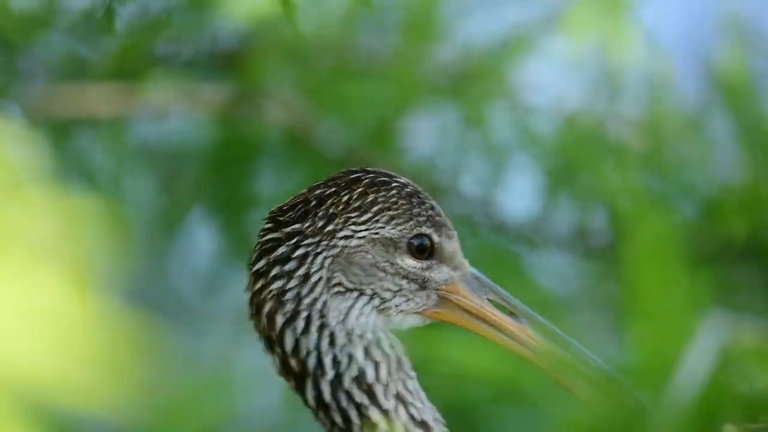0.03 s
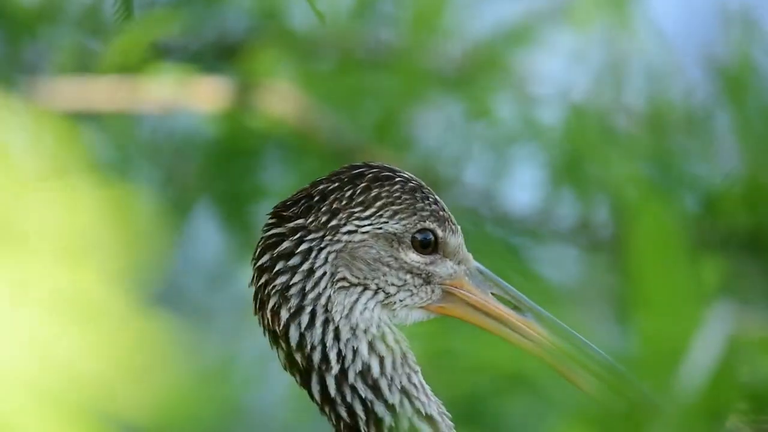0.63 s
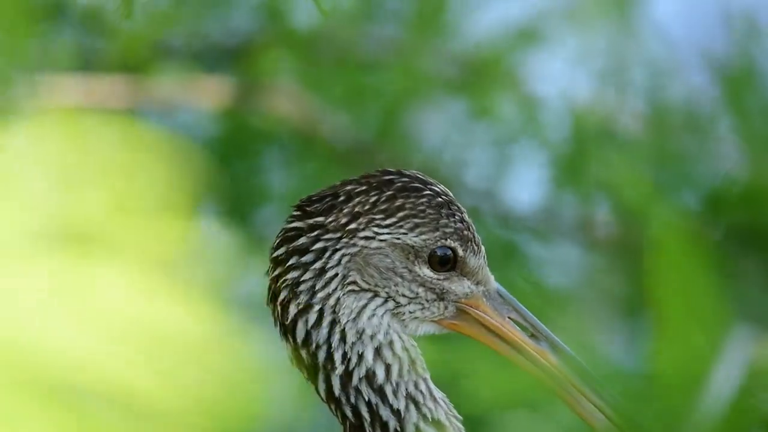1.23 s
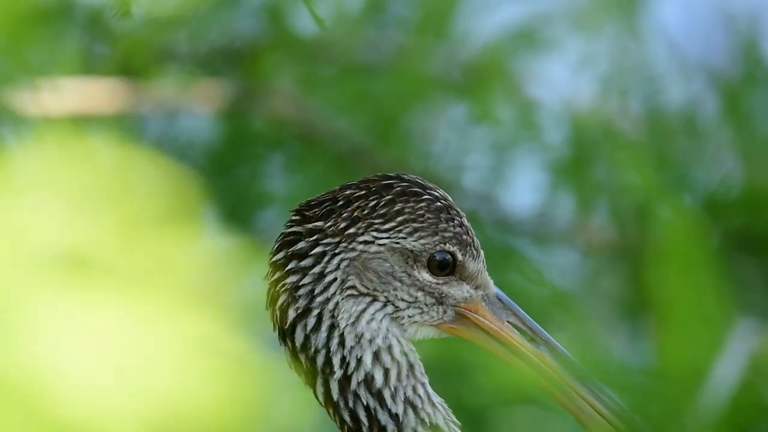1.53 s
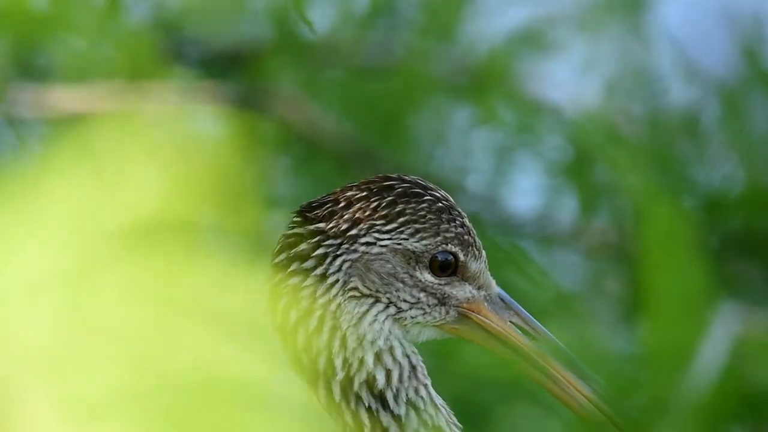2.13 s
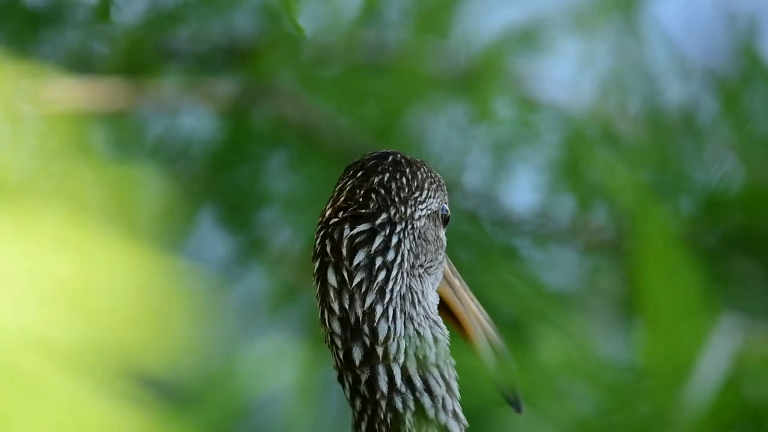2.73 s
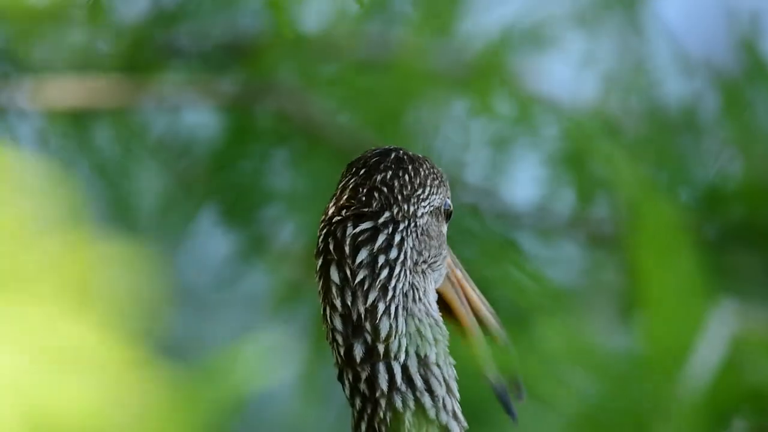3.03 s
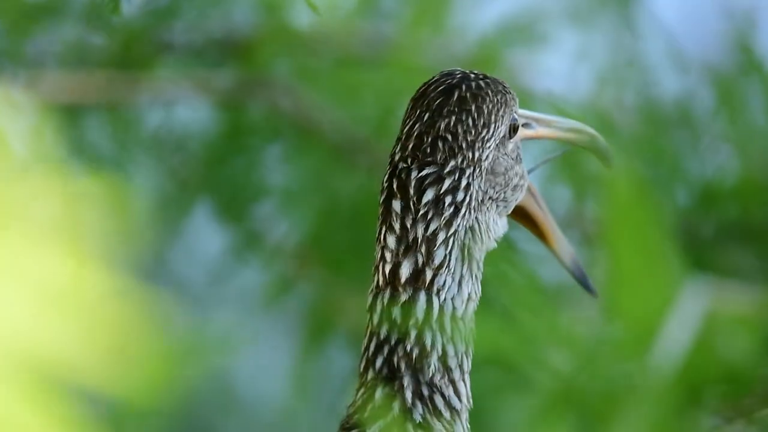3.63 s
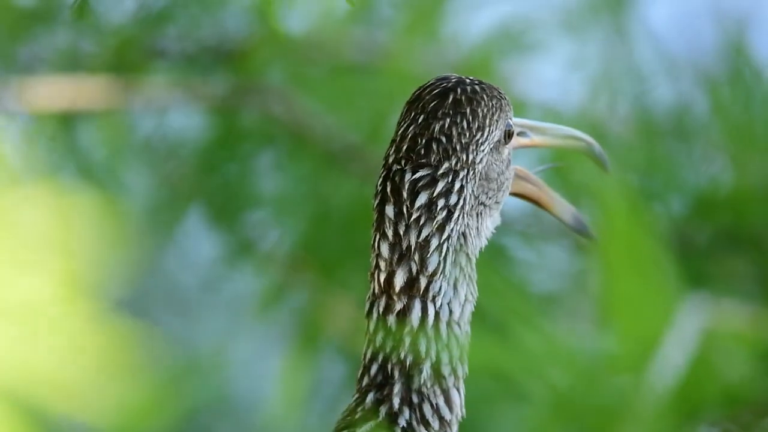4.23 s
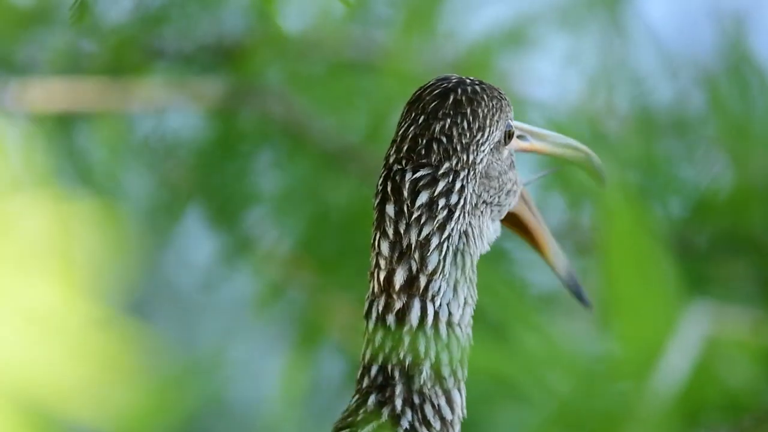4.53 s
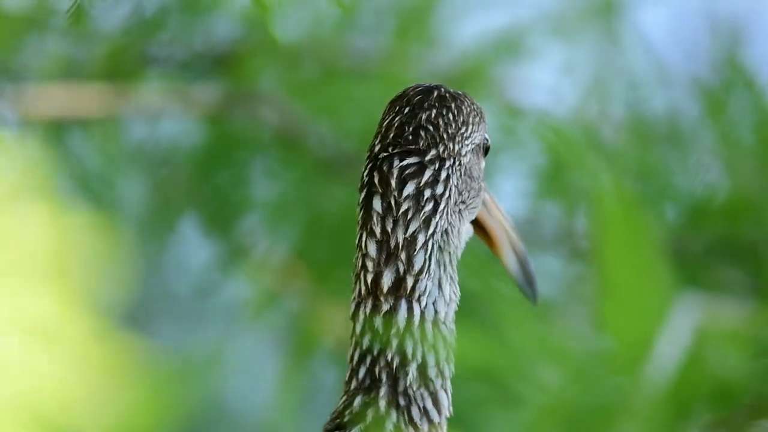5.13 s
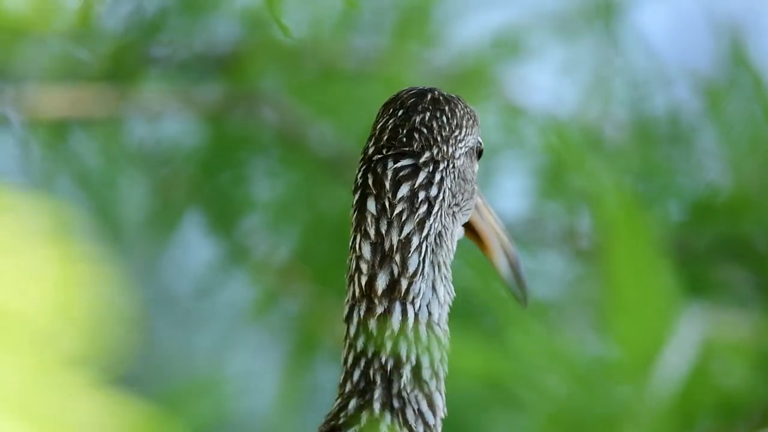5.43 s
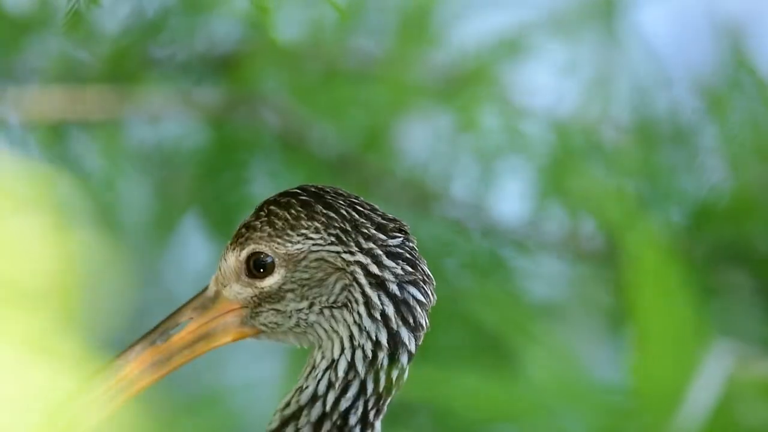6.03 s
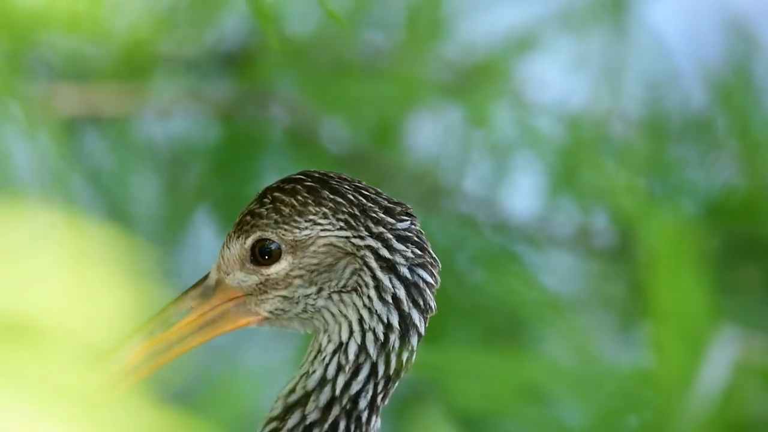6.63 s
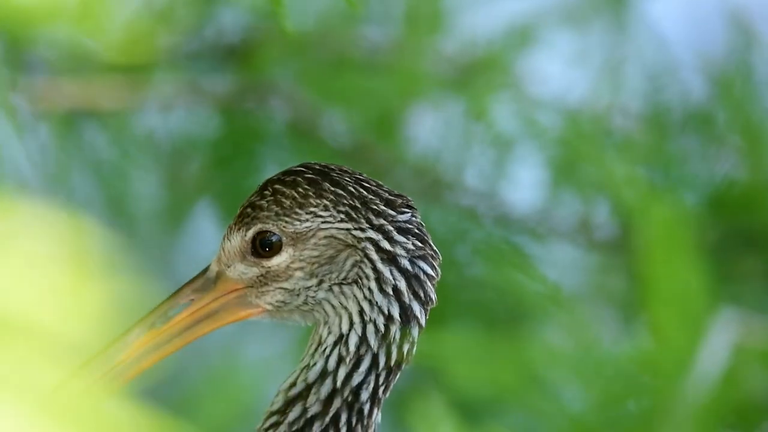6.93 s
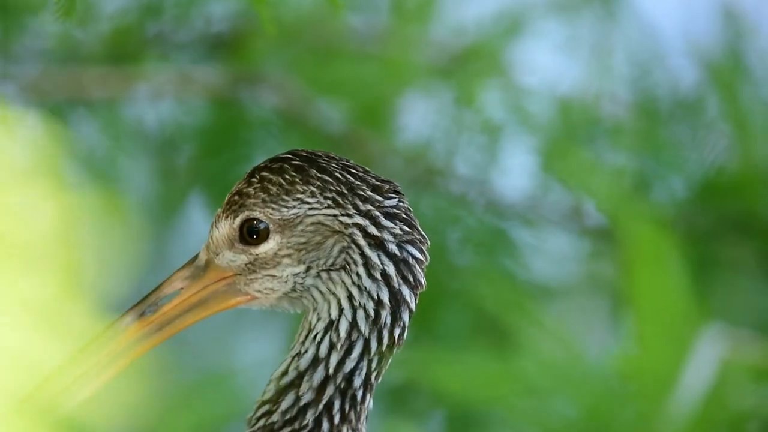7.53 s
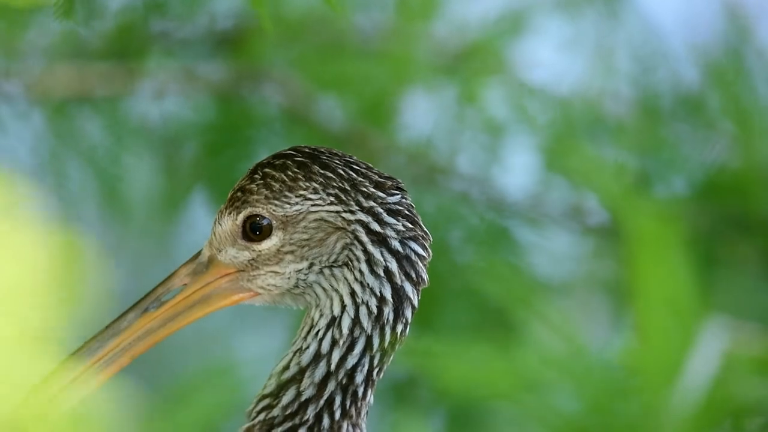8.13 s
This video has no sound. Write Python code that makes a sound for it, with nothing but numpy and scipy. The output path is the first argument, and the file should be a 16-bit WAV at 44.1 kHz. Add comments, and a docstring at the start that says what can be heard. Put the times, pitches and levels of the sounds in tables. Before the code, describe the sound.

Outdoors among trees, a soft far rumble, a light hiss and a very faint insect note run throughout. For the first 2.5 seconds, uneven wind buffets the microphone with low rumbles and dull thumps, strongest from 1.5 to 2.3 seconds, alongside faint dry trills and barely audible leaves. At about 3.1 seconds a wading bird close by breaks from a short rasp into a loud, high, harsh wail. It holds, turns rough, sags in pitch and ends in a croak near 3.8 seconds. At 4.5 seconds a second, shorter call follows: a rasp, a brief wail and a croak ending near 4.9 seconds. Both leave a slight echo among the trees. Small birds give short falling chirps and higher peeps throughout, with thin whistles between 5 and 6.6 seconds. Scattered tiny twig ticks and chirps continue until the end, just after 8 seconds.

```python
"""Wading bird wailing among trees

A bird close by gives two loud wails. Each breaks out of a rasp (syrinx pulses ringing the throat),
passes between a clear harmonic tone and a split one an octave lower, and ends in a croak.
Before it calls, eddies of wind buffet the microphone and leaves rustle. Small birds chirp in gliding
tones, an insect trills, twigs tick with a woody ring, and a far rumble lies under it all."""
import sys
import numpy as np
from scipy import signal
from scipy.fft import rfft, irfft
from scipy.io import wavfile
from scipy.ndimage import uniform_filter1d, map_coordinates

SR = 44100
rng = np.random.default_rng(int(sys.argv[2]) if len(sys.argv) > 2 else 0)


def unload_wav(signal):
    """Save mono or channel-first audio to the path in sys.argv[1] as 16-bit WAV at rate SR, clipped to [-1, 1]."""
    wavfile.write(
        sys.argv[1],
        SR,
        np.round(np.clip(np.atleast_2d(signal).T, -1, 1) * 32767).astype(np.int16),
    )


N = 369999
TIME = np.arange(N) / SR
FREQS = np.maximum(np.fft.rfftfreq(N + 5001, 1 / SR), 1)

# spectra of the far rumble, diffuse hiss and leaves: (frequency [Hz], relative level [dB])
FAR_SPECTRUM = [(20, -18), (60, -8.5), (110, -3), (220, -2.5), (400, -7.5), (1000, -11.5), (2150, -14),
                (2550, -16.5), (2750, -18), (3800, -29), (7000, -56.5)]
HISS_SPECTRUM = [(100, -37), (1000, -19.5), (2500, 4.5), (3600, 3.5), (4800, 4), (6000, 1.5), (7200, -8),
                 (9000, -11.5), (12000, -13), (15500, -19)]
LEAF_SPECTRUM = [(1500, -3), (4800, 16.5), (7000, 7), (9000, 8), (12500, -3), (15500, -13)]
# far drone: (frequency [Hz], level [dB])
DRONE_TONES = [(223, -54), (433, -55.5)]
# swells of the leaves: (centre time [s], half length [s], relative level [dB])
LEAF_SWELLS = [(.03, 0.057, -54), (.21, 0.052, -57), (1.32, 0.068, -57), (1.8, .1, -58.5),
               (1.99, 0.13, -58)]

# wind strength at the microphone: (time [s], level [dB])
WIND_CURVE = [(0.0, -22), (0.13, -26), (0.26, -24), (0.47, -27.5), (0.52, -36), (0.9, -43), (0.98, -46.5),
              (1.18, -45), (1.4, -29), (1.64, -31.5), (1.76, -18.5), (1.91, -26.5), (2.07, -17.5),
              (2.24, -32.5), (2.29, -18.5), (2.42, -25.5), (2.66, -40.5), (2.73, -51)]
# short dull puffs: (centre time [s], half length [s], level [dB])
WIND_PUFFS = [(.022, 0.0075, -24), (.575, 0.021, -25), (.625, 0.016, -21.5), (.745, 0.025, -27.5),
              (.808, 0.0065, -22.5), (.87, 0.033, -25.5), (1.07, 0.012, -26.5), (1.287, 0.0063, -24.5),
              (1.562, 0.019, -16), (2.62, 0.083, -31), (2.97, 0.021, -29.5), (3.53, .11, -38.5),
              (5.52, 0.063, -41)]
# hardest eddies: (time [s], relative peak level [dB])
HARD_EDDIES = [(0.019, -4.5), (0.085, -5.5), (0.205, -6.5), (0.255, -2), (0.33, -14), (0.349, -7),
               (0.574, -7.5), (0.806, -10), (1.462, -6), (1.548, 3), (1.562, 4.5), (1.578, -2), (1.686, -8),
               (1.868, -15), (2.035, -5), (2.064, -17), (2.273, -2.5)]
# spectra of the wind's rumble and flutter: (frequency [Hz], relative level [dB])
WIND_SPECTRUM = [(20, -31), (45, -17), (80, -6), (150, 1), (330, 2), (450, -4), (650, -20), (1200, -64.5)]
FLUTTER_SPECTRUM = [(200, -18.5), (380, -5), (500, 0.5), (700, -4.5), (1000, -15.5), (1500, -32),
                    (2500, -36), (6000, -75)]
# stereo balance of the wind: (frequency [Hz], left minus right [dB])
WIND_BALANCE = [(150, 0), (380, 3), (800, 9), (1300, 8), (2400, 2.5)]

# twig ticks: (time [s], peak level [dB], left minus right [dB], gain of the woody mode [dB])
TWIG_TICKS = [(0.094, -29, -11, 21), (0.564, -25.5, -8, 17), (1.7304, -20, -5, 4), (2.162, -26.5, 8, -6),
              (2.2044, -25.5, 9, -4), (2.5981, -27, 9, -2), (2.683, -20.5, 7.5, -2), (3.0636, -24.5, 9, 3),
              (3.151, -24, 7.5, -5), (4.107, -25, -12, 23), (4.5007, -21.5, 7, 6), (4.878, -21.5, -3, 2),
              (5.4977, -31, -9, 7), (5.5908, -29, -3, 3), (6.703, -32, 11, 0), (6.8327, -29.5, 13, -4.5),
              (7.979, -31, 5, 4), (8.0344, -29, -1.5, 0), (8.182, -24, 6, 0)]
# resonances of a crack: (frequency [Hz], bandwidth [Hz], gain [dB])
CRACK_MODES = [(3670, 820, -10), (4960, 330, 1.5), (8700, 4600, -17), (12000, 3100, -22.5)]
# dry trills: (centre time [s], length [s], relative level [dB])
TRILL_SWELLS = [(0.054, 0.67, -53.5), (0.538, 0.14, -49), (0.911, 0.16, -46.5), (1.328, 0.28, -49.5),
                (1.682, 0.2, -47), (2.606, 0.11, -52.5), (2.927, 0.12, -45)]
# their buzz: (frequency [Hz], relative level [dB])
BUZZ_SPECTRUM = [(3000, -7.5), (4900, -0.5), (5700, 5.5), (6500, 2), (7200, -7), (8500, -8.5), (11000, -46)]
# falling chirps: (centre time [s], level [dB], centre pitch [Hz], second harmonic [dB])
FALLING_CHIRPS = [(.272, -18.5, 2384, -11.5), (1.42, -19, 2418, -13.5), (3.122, -24, 2320, -8.5),
                  (5.256, -41, 2850, -12), (5.558, -44.5, 2940, -12), (5.91, -26, 2357, -13),
                  (6.967, -27.5, 2300, -14), (7.938, -22, 2410, -9)]
# arched chirps: (centre time [s], relative level [dB], top pitch [Hz])
ARCHED_CHIRPS = [(.375, -40, 4700), (1.48, -36.5, 4750), (1.701, -35, 4450), (1.944, -34.5, 4530),
                 (2.192, -36.5, 4670), (4.1, -37, 4480), (5.29, -39.5, 4600), (5.545, -36.5, 4470),
                 (5.838, -30.5, 4660), (6.089, -30.5, 4480), (8.189, -38.5, 4500)]
# rising whistles: (centre time [s], level [dB], centre pitch [Hz], half length [s], jitter [fraction])
RISING_WHISTLES = [(1.847, -41, 5080, 0.022, 0.0048), (5.077, -45.5, 5550, 0.03, 0.012),
                   (5.217, -47, 5630, 0.021, 0.068), (5.42, -57, 5300, 0.033, .004),
                   (5.474, -42.5, 5500, 0.016, 0.056), (5.61, -51, 5250, 0.026, .004),
                   (5.774, -45.5, 5350, 0.016, 0.072), (6.014, -46, 5400, 0.016, .06),
                   (6.194, -47, 5230, 0.031, .004), (6.428, -50.5, 5290, 0.03, .004),
                   (6.61, -56, 5170, 0.037, .004)]

# rasps and croaks: (start [s], full strength [s], end [s], relative level [dB], pitch [Hz],
# flutter rate [Hz], jitter [fraction])
RASP_BURSTS = [(3.105, 3.107, 3.119, -22.5, 1220, 158, 0.066), (3.16, 3.169, 3.196, -16.5, 1350, 240, 0.08),
               (3.214, 3.218, 3.227, -14.5, 1430, 227, 0.079),
               (3.745, 3.797, 3.798, -23.5, 1220, 130, 0.16), (3.799, 3.794, 3.82, -20, 1247, 196, 0.22),
               (3.842, 3.848, 3.851, -22, 1202, 186, .1), (4.501, 4.535, 4.548, -18, 1194, 157.5, .1),
               (4.538, 4.56, 4.627, -12, 1595, 193, 0.092), (4.748, 4.76, 4.808, -25.5, 1230, 180, 0.16),
               (4.815, 4.822, 4.852, -21, 1261, 180, 0.093)]
# formants of the throat and open bill: (frequency [Hz], bandwidth [Hz], gain [dB])
THROAT_MODES = [(1166, 45, 10.5), (1660, 540, -1), (2280, 150, -1.5), (2760, 88, 1.5), (3354, 34, 3.5),
                (3910, 140, 1.5), (5260, 1400, -5), (6380, 1000, 5)]
# arch of each wail: (time [s], clear pitch [Hz], effort [dB])
FIRST_ARCH = [(3.228, 1439, -5.5), (3.25, 1405, -1.5), (3.35, 1461, -.5), (3.42, 1482, 3), (3.54, 1457, 0),
              (3.575, 1407, -0.5), (3.72, 1333, -2), (3.787, 1271, -5), (3.8, 1162, -10.5)]
SECOND_ARCH = [(4.632, 1455, -0.5), (4.66, 1486, 1.5), (4.712, 1464, 2.5), (4.733, 1389, -1.5),
               (4.765, 1297, -2), (4.805, 1258, -5.5), (4.82, 1109, -9), (4.847, 1270, -12.5)]
# response of windpipe and bill for harmonics 1-4: (frequency [Hz], gain [dB])
TRACT_RESPONSE = [(1050, -4.5), (1205, -3), (1285, -19.5), (1370, -14.5), (1470, -14), (2100, -21.5),
                  (2430, -20.5), (2555, -25.5), (2670, -14.5), (2790, -10), (2930, -18.5), (3400, -21),
                  (3760, -14), (4050, -24.5), (4190, -31), (4390, -21.5), (4900, -30.5), (5900, -27)]
# higher harmonics: (frequency [Hz], level relative to the fourth [dB])
UPPER_HARMONICS = [(5500, -7), (6300, -5.5), (7200, -16), (8800, -19.5), (11500, -32), (15000, -53)]
# spans of split voice: (start [s], end [s], relative level of the subharmonics [dB])
SPLIT_SPANS = [(3.21, 3.369, -14.5), (3.656, 3.83, -16.5), (4.759, 4.87, -20)]
# subharmonics, halfway between the harmonics: (frequency [Hz], relative level [dB])
SUBHARMONIC_SPECTRUM = [(650, -12.5), (2000, -11.5), (3000, -3.5), (3270, 7), (3550, -8), (4400, -2),
                        (4800, -10), (5700, -8), (6700, -21), (8500, -28), (12000, -39), (15000, -74)]
# stereo balance of the voice: (frequency [Hz], left minus right [dB])
VOICE_BALANCE = [(700, 4.5), (1300, 0.5), (1480, -4.5), (2400, -1.5), (3000, 5), (4400, 4.5), (8000, -0.5),
                 (15000, 4)]
# its phase between the microphones: (frequency [Hz], left lead [rad])
VOICE_PHASE = [(1500, 0.079), (2500, 1.07), (3000, 0.97), (3800, 1.4), (4500, 1.43), (5200, -1.5),
               (6000, 2), (8000, 1.7), (12000, 1.6)]

# notches of the microphone housing: (frequency [Hz], bandwidth [Hz])
HOUSING_NOTCHES = [(7700, 1100), (9600, 1220)]
MIC_LAG_MS = .125


def from_db(db):
    """Decibels to amplitude ratio."""
    return 10 ** (np.asarray(db) / 20)


def rms_one(x):
    """Normalisation to unit rms."""
    return x / np.sqrt(np.mean(x ** 2) + 1e-20)


def at_hz(points, hz):
    """Interpolation on a log-frequency axis."""
    f, value = np.transpose(points)
    return np.interp(np.log(hz), np.log(f), value)


def in_time(rows, t):
    """Linear interpolation of each column at times t."""
    times, *columns = np.transpose(rows)
    return [np.interp(t, times, column) for column in columns]


def phase_of(hz):
    """Phase is the time integral of frequency."""
    return 2 * np.pi * np.cumsum(hz) / SR


def swells(rows):
    """Superposition of Gaussian envelopes, as a gain."""
    return sum(from_db(db) * np.exp(-((TIME - s) / half) ** 2) for s, half, db in rows)


def drift(rate, t=TIME):
    """Smooth random modulation of roughly unit spread, from `rate` values a second."""
    return map_coordinates(rng.standard_normal(40000), [(t - t[0]) * rate], order=2, mode="wrap")


def filtered(x, response):
    """Filtering multiplies the spectrum by a response given on FREQS."""
    size = 2 * (len(FREQS) - 1)
    return irfft(rfft(x, size) * response, size)[..., :N]


def band_limit(x, order, hz, kind="low"):
    """Filtering with a maximally flat passband."""
    return signal.sosfilt(signal.butter(order, hz, kind, fs=SR, output="sos"), x)


def noise(spectrum):
    """Spectral shaping of white noise, at unit rms."""
    return rms_one(filtered(rng.standard_normal(N), from_db(at_hz(spectrum, FREQS))))


def resonate(x, modes):
    """Modal superposition: damped resonators in parallel, with alternating sign."""
    out = 0
    for k, (hz, width, db) in enumerate(modes):
        r = np.exp(-np.pi * width / SR)
        poles = [1, -2 * r * np.cos(2 * np.pi * hz / SR), r * r]
        ringing = signal.lfilter([1, 0, -1], poles, x + 1e-18)
        out = out + (-1) ** k * from_db(db) * (1 - r * r) / 2 * ringing
    return out


def place(x, pan_db, lead):
    """Level and phase differences give direction: the left is pan_db louder and `lead` radians ahead."""
    half = from_db(pan_db / 2) * np.exp(.5j * lead)
    return filtered(x, np.array([half, 1 / half]))


def delay_left(x, pan_db, lag_ms):
    """A path difference makes the sound reach the left microphone late."""
    return place(x, pan_db, -2 * np.pi * FREQS * lag_ms / 1000)


def trees(x, t60, tail_db, leaf_db, leaf_s, leaf_hz=6000):
    """Scattering: near leaves return short waves; trunks add a tail, different at each microphone."""
    t = TIME[:SR // 2]
    echoes = rng.standard_normal((2, 2, len(t))) * (t > .001) / np.sqrt(len(t))
    scatter = band_limit(echoes[0] * rms_one(np.exp(-t / leaf_s)), 1, leaf_hz, "high")
    tail = echoes[1] * rms_one(from_db(-60 * t / t60))
    return signal.fftconvolve(x, from_db(leaf_db) * scatter + from_db(tail_db) * tail, axes=1)[:, :N]


def background(rumble_db=-41, swell_db=2, swell_below_hz=450, hiss_db=-54.5):
    """Ambient noise: far rumble and drone are coherent at the two microphones, diffuse hiss is not."""
    drone = 0
    for hz, db in DRONE_TONES:
        amplitude = np.sqrt(2) * from_db(db + 1.55 * drift(4.3))
        drone = drone + amplitude * np.sin(phase_of(hz * (1 + .0058 * drift(12))))
    steady = from_db(rumble_db) * noise(FAR_SPECTRUM)
    bass = filtered(steady, 1 / (1 + (FREQS / swell_below_hz) ** 4))
    rumble = steady - bass + bass * from_db(swell_db * drift(9))
    hiss = from_db(hiss_db) * np.array([noise(HISS_SPECTRUM), noise(HISS_SPECTRUM)])
    return delay_left(rumble + drone, pan_db=-1.95, lag_ms=MIC_LAG_MS) + hiss


def wind_level(decay_db_per_s=24):
    """Wind strength in dB, with exponential decay after the last gust."""
    level_db, = in_time(WIND_CURVE, TIME)
    return level_db - decay_db_per_s * np.maximum(TIME - WIND_CURVE[-1][0], 0)


def leaves():
    """Amplitude-modulated noise: a fine rustle swells a few times and dies with the wind."""
    stir = swells(LEAF_SWELLS) + from_db(wind_level() - 53)
    grain = from_db(9 + 4 * drift(300))
    return stir * grain * np.array([noise(LEAF_SPECTRUM), noise(LEAF_SPECTRUM)])


def buffets(wind_db, lesser_per_s=30, spread_db=8.5, eddy_s=.0014):
    """Eddies are pressure pulses on the microphone: a few hard, the lesser random and wind-scaled."""
    wait, strength = rng.random((200, 2)).T
    times = np.cumsum(-np.log(1 - wait)) / lesser_per_s
    excess_db = 8.5 + spread_db * (2 * strength - 1)
    lesser = [(s, wind_db[int(s * SR)] + db) for s, db in zip(times, excess_db) if s < WIND_CURVE[-1][0]]
    out = np.zeros(N)
    t = TIME[:SR // 30]
    swirls = rng.standard_normal((len(HARD_EDDIES) + len(times), len(t))) * t * np.exp(-t / eddy_s)
    for (s, db), swirl in zip(HARD_EDDIES + lesser, swirls):
        thump = band_limit(resonate(swirl, [(440, 210, 0)]), order=2, hz=1400)
        at = int(s * SR)
        out[at:at + len(t)] += from_db(db - 7) * thump / abs(thump).max()
    return out


def wind(flutter_db=-18.5, flutter_db_per_db=1.52):
    """Turbulence rumbles on the microphone; a higher flutter grows faster with wind strength."""
    wind_db, puffs = wind_level(), swells(WIND_PUFFS)
    lumps_db = 4 * drift(130)
    flutter = from_db(flutter_db + flutter_db_per_db * (wind_db - wind_db.max())) + from_db(-12) * puffs
    low = (from_db(wind_db) + puffs) * rms_one(noise(WIND_SPECTRUM) * from_db(.64 * lumps_db))
    high = flutter * rms_one(noise(FLUTTER_SPECTRUM) * from_db(lumps_db))
    return delay_left(low + high + buffets(wind_db), at_hz(WIND_BALANCE, FREQS), MIC_LAG_MS)


def twigs(decay_s=.0012, ring_s=.015, wood_hz=2130, wood_width_hz=220):
    """Impulsive excitation: each tiny crack briefly rings the modes of the wood."""
    out = np.zeros((2, N))
    t = TIME[:SR // 40]
    for s, db, pan_db, wood_db in TWIG_TICKS:
        snap = rng.standard_normal(len(t)) * (np.exp(-t / decay_s) + .095 * np.exp(-t / ring_s))
        crack = resonate(snap, [(wood_hz, wood_width_hz, wood_db), *CRACK_MODES])
        gains = from_db(db + np.array([[.5], [-.5]]) * pan_db)
        at = int(s * SR)
        out[:, at:at + len(t)] += gains * crack / abs(crack).max()
    return out


def trills(pips_per_s=60, pip_hz=4300, buzz_rate_hz=125):
    """Amplitude modulation: a run of tiny falling pips under a faster, higher buzz of pulsed noise."""
    swell = sum(from_db(db) * np.exp(-(2 * (TIME - s) / length) ** 4) for s, length, db in TRILL_SWELLS)
    buzz = from_db(-1.5) * noise(BUZZ_SPECTRUM) * (1 + .62 * np.sin(2 * np.pi * buzz_rate_hz * TIME))
    beat = np.cumsum(pips_per_s * (1 + .055 * drift(10))) / SR % 1
    pitch = pip_hz * (1 + .039 * drift(60) - .11 * (beat - .5))
    pips = from_db(3) * np.sin(np.pi * beat) ** 4 * np.sin(phase_of(pitch))
    return delay_left(swell * (buzz + pips), pan_db=-3, lag_ms=.039)


def insect(hz=2450, width_hz=70, db=-56):
    """Narrow-band noise is heard as a pitch: one insect holds a thin note."""
    mode = [(hz, width_hz, 0)]
    note = rms_one(resonate(resonate(rng.standard_normal(N), mode), mode))
    return delay_left(from_db(db) * note, pan_db=18, lag_ms=.1)


def chirp(middle, db, hz, slope, bend, half_s, octave_db, jitter):
    """Frequency modulation: a near sine glides by `slope` [octaves/s] and `bend` [octaves/s^2]."""
    out = np.zeros(N)
    live = slice(max(int((middle - 2 * half_s) * SR), 0), int((middle + 2 * half_s) * SR))
    t = TIME[live] - middle
    phase = phase_of(hz * 2 ** (slope * t + bend * t * t) * (1 + jitter * drift(711, t)))
    swell = np.exp(-(t / half_s) ** 2) * signal.windows.tukey(len(t), .3)
    tone = np.sin(phase) + from_db(octave_db) * np.sin(2 * phase)
    out[live] = from_db(db + 4.7 * drift(167.5, t)) * swell * tone
    return out


def small_birds():
    """Falling, arched and rising glides; pitch jitter broadens some into hoarseness."""
    falls = sum(chirp(s, db, hz, slope=-6.5, bend=10, half_s=.029, octave_db=octave, jitter=.011)
                for s, db, hz, octave in FALLING_CHIRPS)
    arches = sum(chirp(s, db - 1, hz, slope=.3, bend=-190, half_s=.038, octave_db=-42, jitter=.04)
                 for s, db, hz in ARCHED_CHIRPS)
    whistles = sum(chirp(s, db, hz, slope=3.3, bend=-13.5, half_s=half, octave_db=-37, jitter=jitter)
                   for s, db, hz, half, jitter in RISING_WHISTLES)
    return delay_left(falls, pan_db=-7, lag_ms=.11) + delay_left(arches + whistles, pan_db=7, lag_ms=.112)


def rasps(flutter_depth=.71, release_s=.0051, band_hz=(950, 5800)):
    """Source and filter: irregular syrinx pulses ring the throat and are chopped by a fast flutter."""
    out = np.zeros(N)
    for start, full, end, db, hz, flutter_hz, jitter in RASP_BURSTS:
        live = (TIME > start) & (TIME < end + .02)
        t = TIME[live]
        cycles = np.cumsum(hz * (1 + jitter * drift(1500, t))) / SR
        pulses = np.diff(np.floor(cycles), prepend=0) + .04 * rng.standard_normal(len(t))
        voiced = resonate(pulses, THROAT_MODES)
        voiced = band_limit(voiced, 4, band_hz, "band") + from_db(-18) * voiced
        # steady air pressure evens the strength
        voiced /= np.sqrt(uniform_filter1d(voiced ** 2, size=350) + 1e-12)
        flutter = np.sin(phase_of(flutter_hz * (1 + .025 * drift(147, t))))
        chopped = voiced * (1 + flutter_depth * flutter)
        saturated = band_limit(np.tanh(chopped / 2), 4, band_hz, "band")
        attack = np.clip((t - start) / max(full - start, .001), 0, 1)
        release = np.exp(-np.maximum(t - end, 0) / release_s)
        out[live] += from_db(db) * attack * release * rms_one(saturated + from_db(-17.5) * chopped)
    return out


def period_doubling(t, switch_s=.017, fade_db_per_s=30, clear_db=-46):
    """Unequal alternate cycles split the voice: gives the degree (0-1) and subharmonic level [dB]."""
    split, sub_db = 0, clear_db
    for start, end, db in SPLIT_SPANS:
        inside = np.minimum(t - start, end - t) / switch_s
        split = split + np.clip(inside + .5, 0, 1)
        sub_db = sub_db + np.clip(inside + 1, 0, 1) * (db - fade_db_per_s * (t - start) - clear_db)
    return split, sub_db


def wail(arch, edge_s=.006):
    """Source and filter: harmonics of the syrinx slide through the resonances of windpipe and bill."""
    start, end = arch[0][0], arch[-1][0]
    live = (TIME > start - edge_s) & (TIME < end + edge_s)
    t = TIME[live]
    clear_hz, effort_db = in_time(arch, t)
    split, sub_db = period_doubling(t)
    # a split voice is flatter and less steady, with a weaker fundamental and stronger high harmonics
    hz = clear_hz * (1 - .055 * split)
    waver = .0014 * drift(93.7, t)
    jitter = .0014 * (1 + .86 * split) * drift(1400, t)
    phase = phase_of(hz * (1 + waver + jitter))
    levels_db = [at_hz(TRACT_RESPONSE, k * hz) for k in range(1, 5)]
    levels_db[0] -= 3.5 * split
    levels_db += [levels_db[3] + at_hz(UPPER_HARMONICS, k * hz) + 4.5 * split for k in range(5, 11)]
    tone = 0
    for k, db in enumerate(levels_db, start=1):
        wobble_db = .99 * min(k - 1, 3) * drift(30.46, t)   # higher harmonics wobble more
        shimmer_db = 1.5 * np.sqrt(min(k, 6) / 2) * drift(109.6, t)
        tone += from_db(db + wobble_db + shimmer_db) * np.sin(k * phase + rng.uniform(0, 2 * np.pi))
        between_db = sub_db + at_hz(SUBHARMONIC_SPECTRUM, (k - .5) * hz) + 3 * drift(50.4, t)
        tone += from_db(between_db) * np.sin((k - .5) * phase + rng.uniform(0, 2 * np.pi))
    hiss = rms_one(resonate(rng.standard_normal(len(t)) * (1 + np.cos(phase)), THROAT_MODES))
    tone += band_limit(hiss, order=2, hz=8500) * (from_db(-48.5) + from_db(sub_db - 33))
    fade = np.clip(np.minimum(t - start, end - t) / edge_s + 1, 0, 1)
    out = np.zeros(N)
    out[live] = tone * from_db(effort_db) * fade
    return out


def scene():
    """Superposition: the caller in front, small birds deeper in the trees, wind on the microphone."""
    voice = wail(FIRST_ARCH) + wail(SECOND_ARCH) + rasps()
    caller = from_db(.88) * place(voice, at_hz(VOICE_BALANCE, FREQS), at_hz(VOICE_PHASE, FREQS))
    birds = small_birds()
    caller += trees(caller, t60=.45, tail_db=-17, leaf_db=-4, leaf_s=.02)
    birds += trees(birds, t60=.55, tail_db=-18, leaf_db=-6, leaf_s=.012)
    return caller + birds + trills() + insect() + twigs() + wind() + leaves() + background()


def record(dry):
    """Frequency response: the microphone housing cuts two treble notches; a steep low-pass follows."""
    for hz, width in HOUSING_NOTCHES:
        dry = signal.lfilter(*signal.iirnotch(hz, hz / width, fs=SR), dry)
    cutoff_hz = 15500
    return signal.sosfilt(signal.ellip(10, .1, 90, cutoff_hz, fs=SR, output="sos"), dry)


dry = scene()
out = record(dry)
unload_wav(out)
```